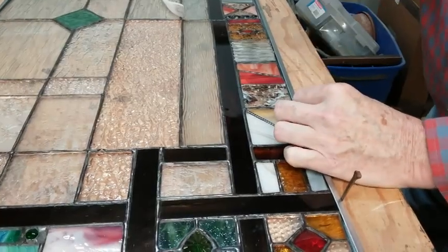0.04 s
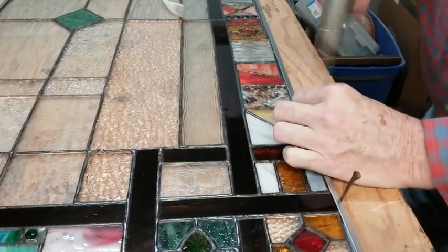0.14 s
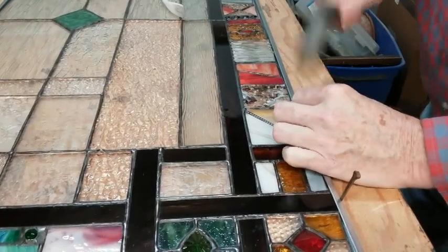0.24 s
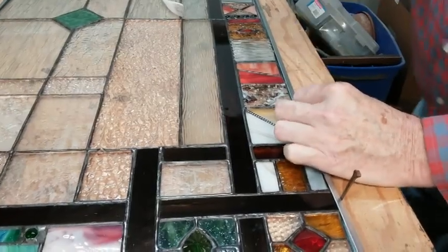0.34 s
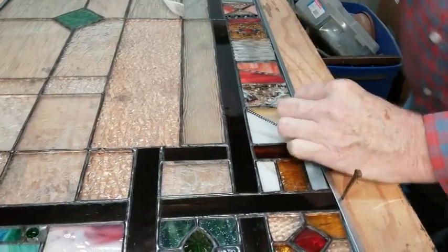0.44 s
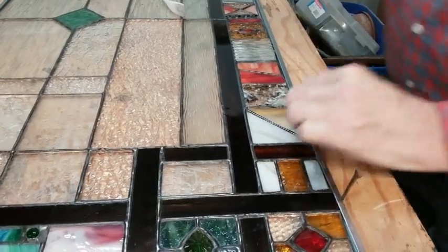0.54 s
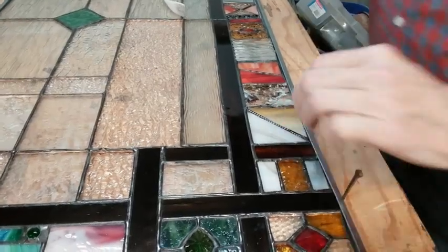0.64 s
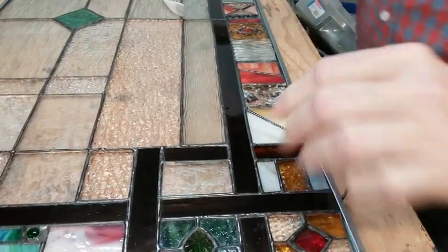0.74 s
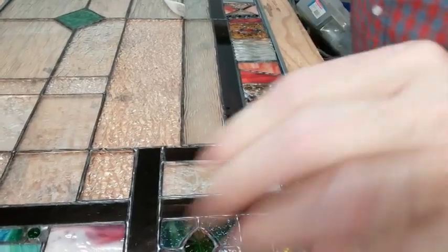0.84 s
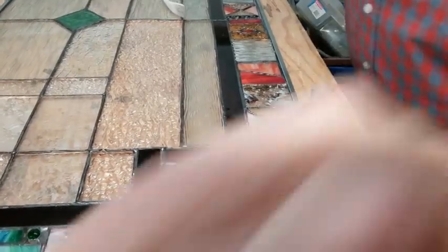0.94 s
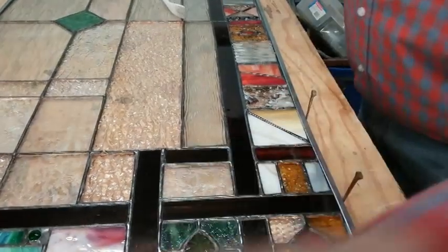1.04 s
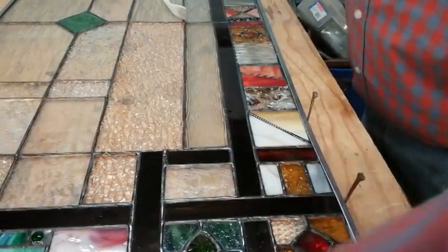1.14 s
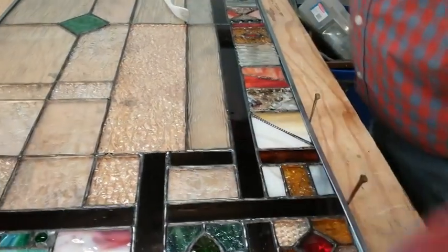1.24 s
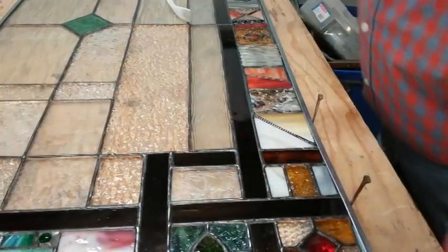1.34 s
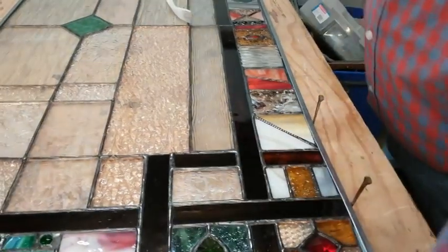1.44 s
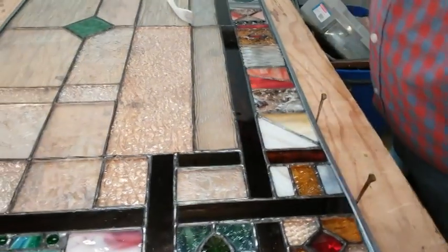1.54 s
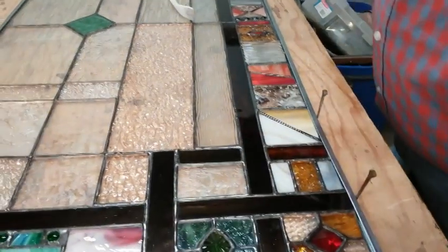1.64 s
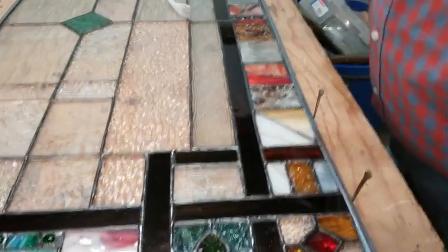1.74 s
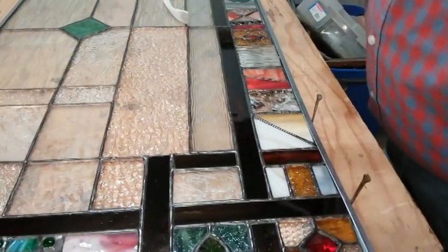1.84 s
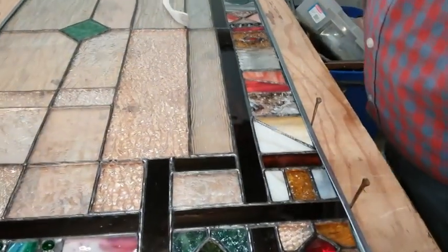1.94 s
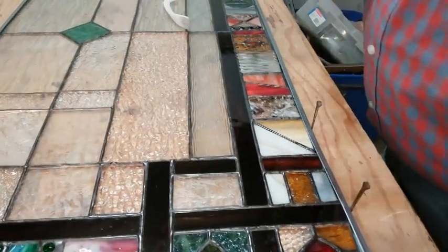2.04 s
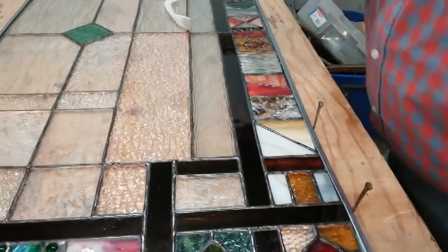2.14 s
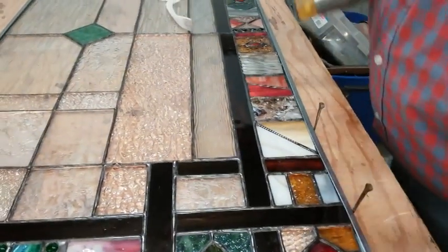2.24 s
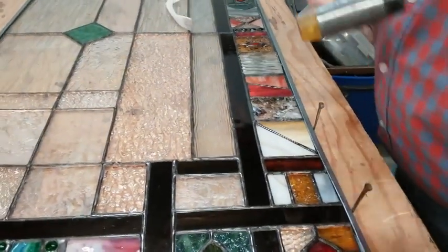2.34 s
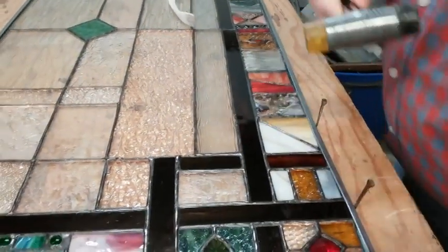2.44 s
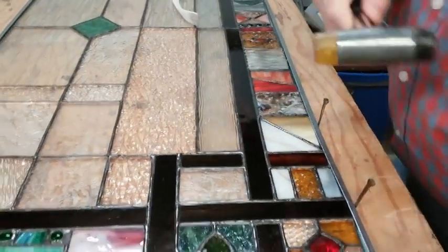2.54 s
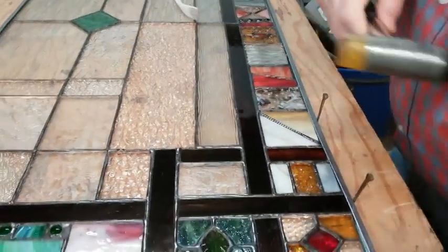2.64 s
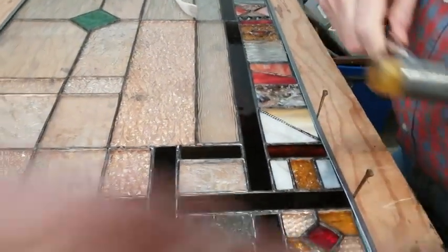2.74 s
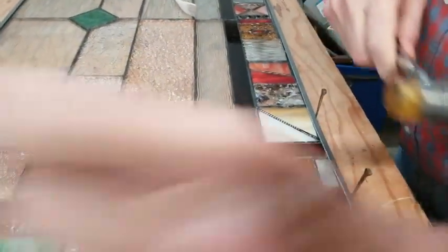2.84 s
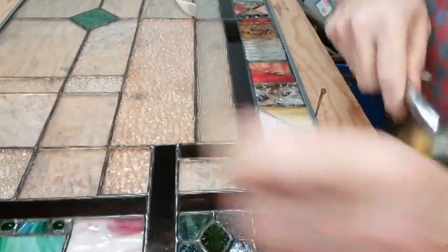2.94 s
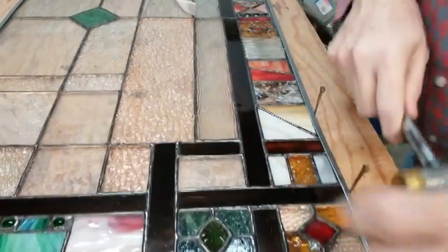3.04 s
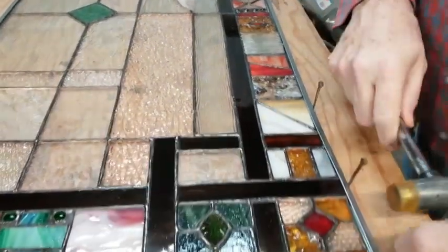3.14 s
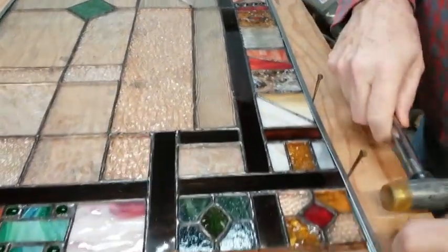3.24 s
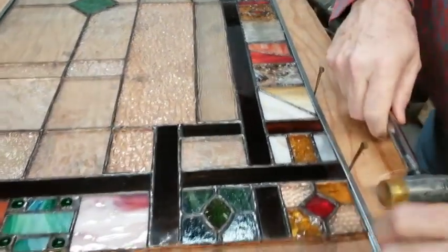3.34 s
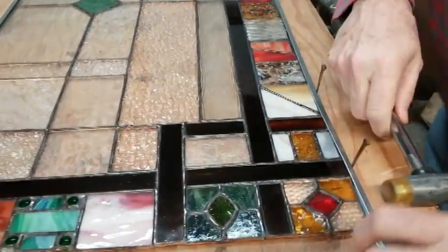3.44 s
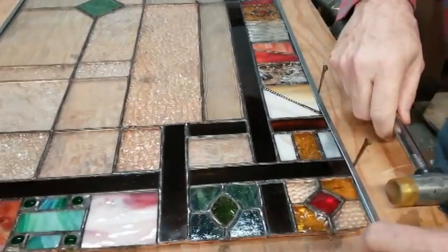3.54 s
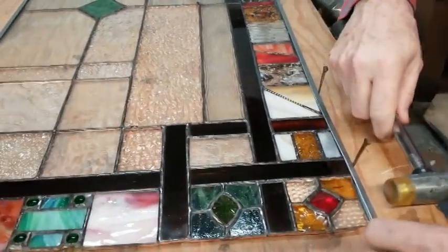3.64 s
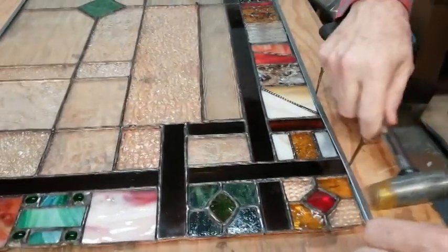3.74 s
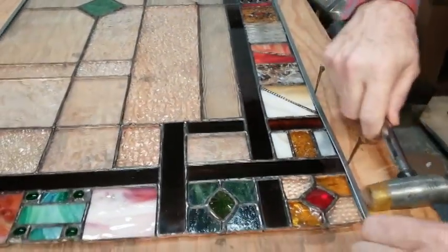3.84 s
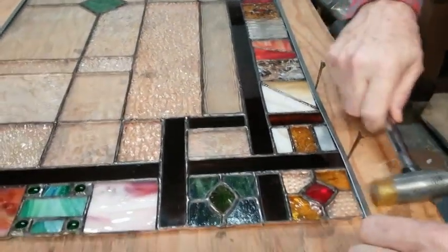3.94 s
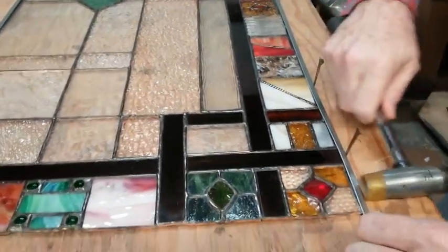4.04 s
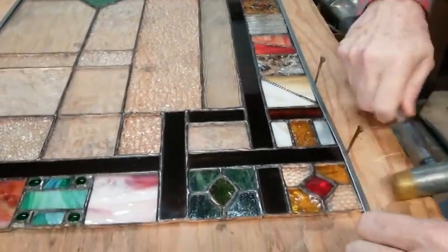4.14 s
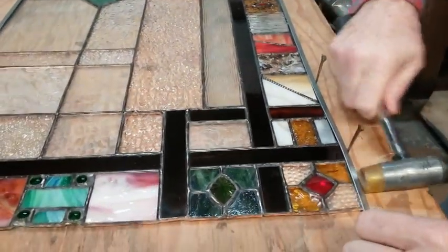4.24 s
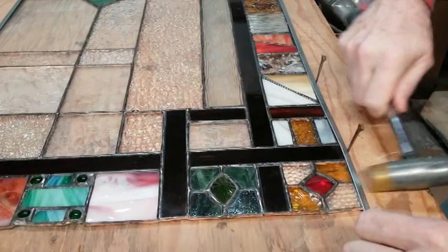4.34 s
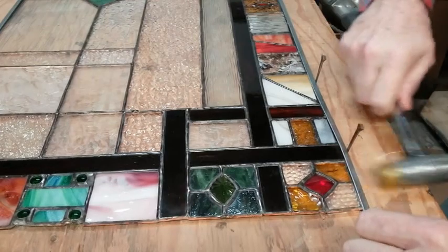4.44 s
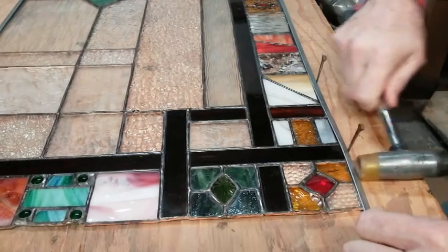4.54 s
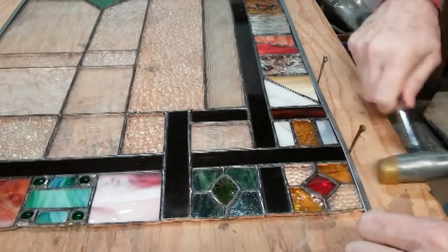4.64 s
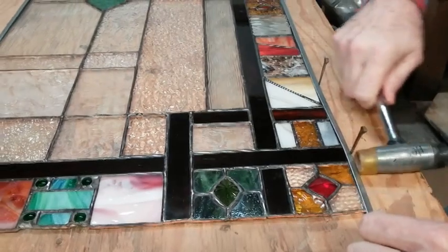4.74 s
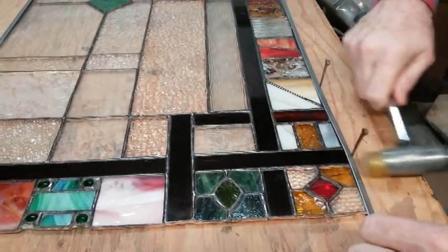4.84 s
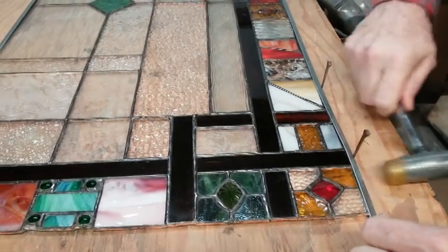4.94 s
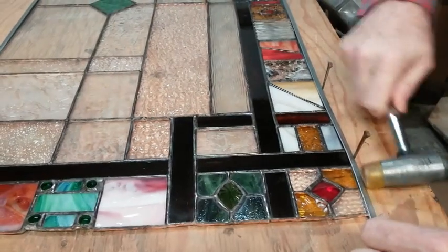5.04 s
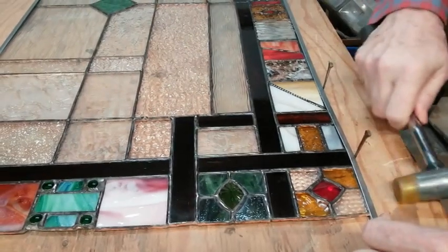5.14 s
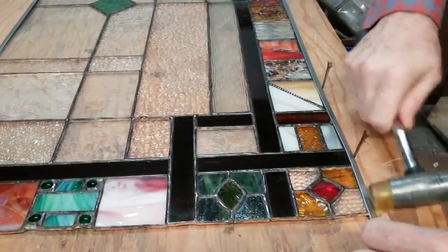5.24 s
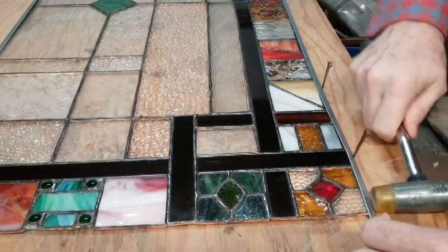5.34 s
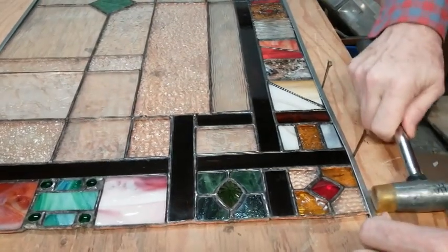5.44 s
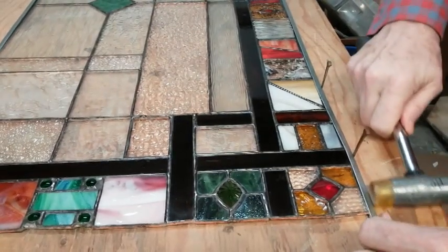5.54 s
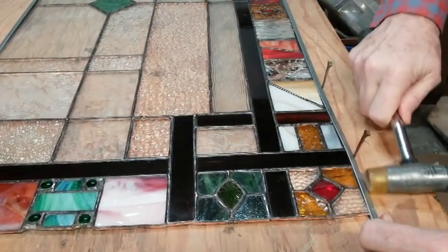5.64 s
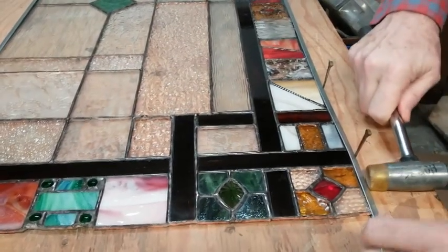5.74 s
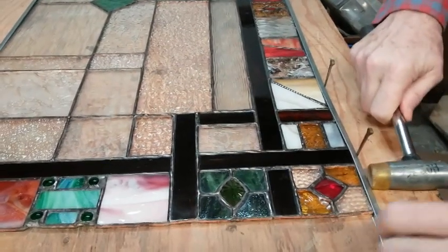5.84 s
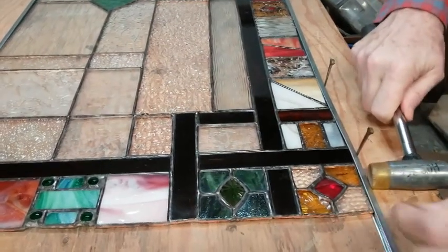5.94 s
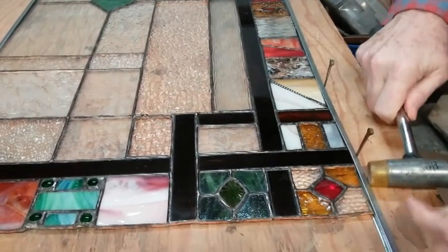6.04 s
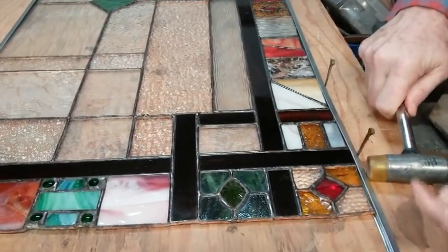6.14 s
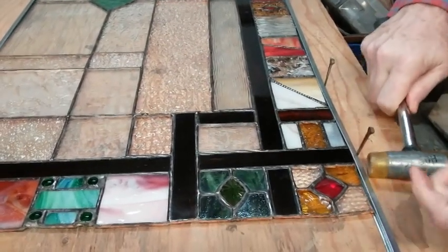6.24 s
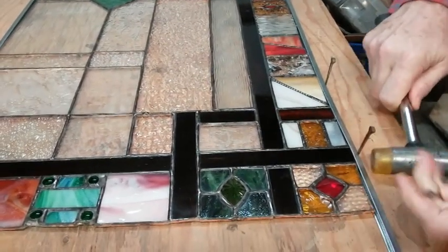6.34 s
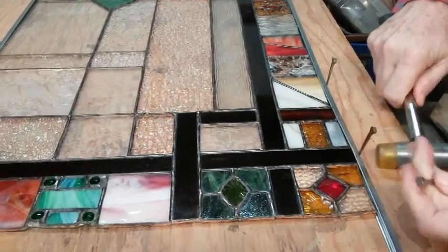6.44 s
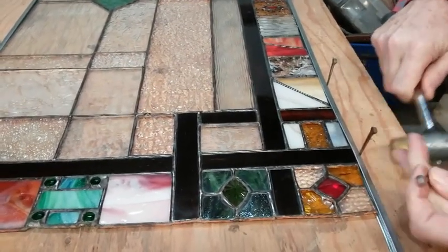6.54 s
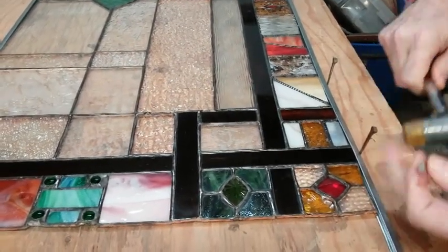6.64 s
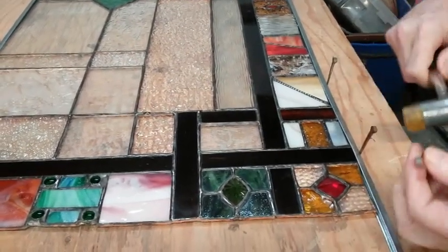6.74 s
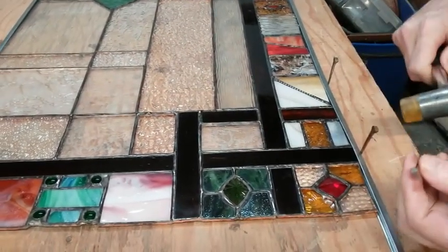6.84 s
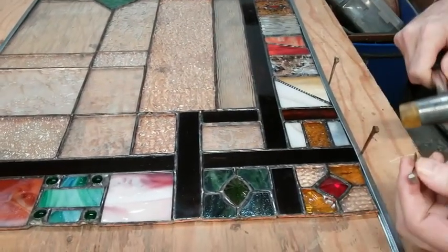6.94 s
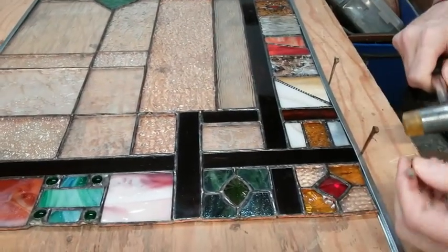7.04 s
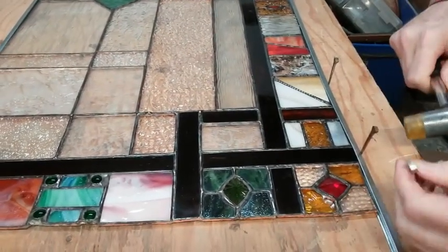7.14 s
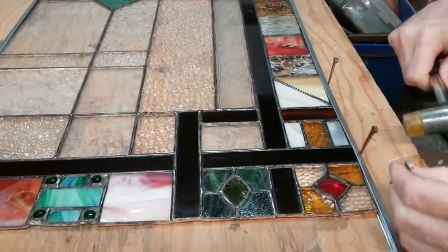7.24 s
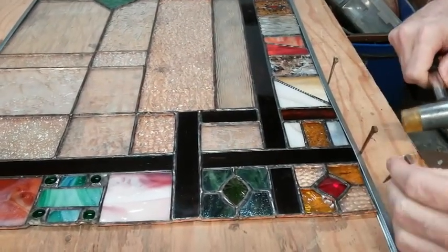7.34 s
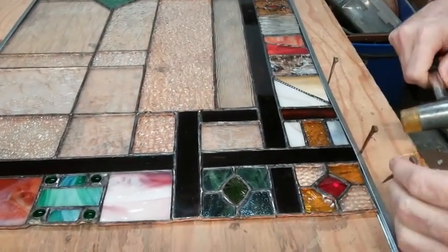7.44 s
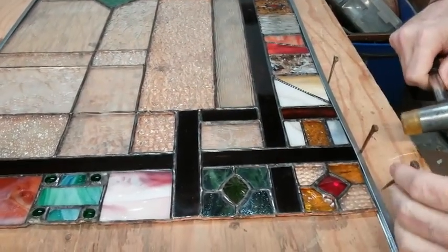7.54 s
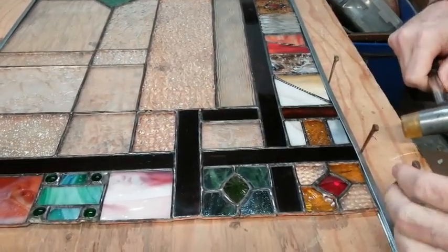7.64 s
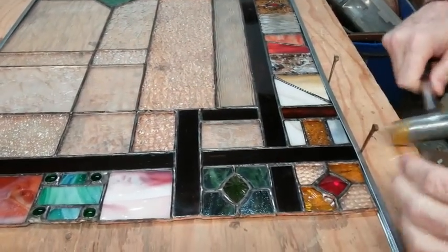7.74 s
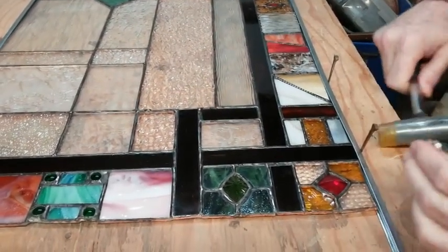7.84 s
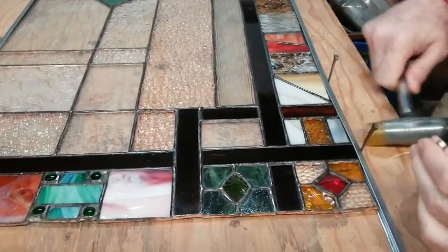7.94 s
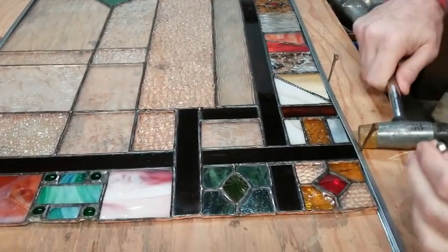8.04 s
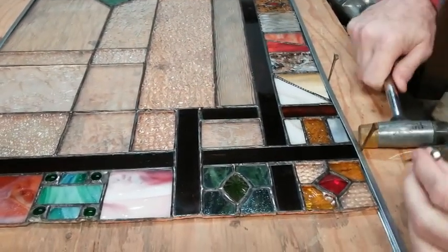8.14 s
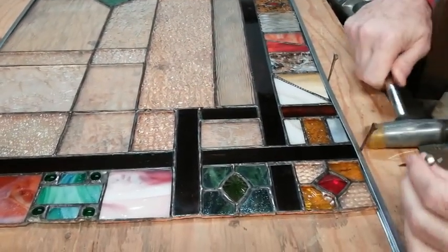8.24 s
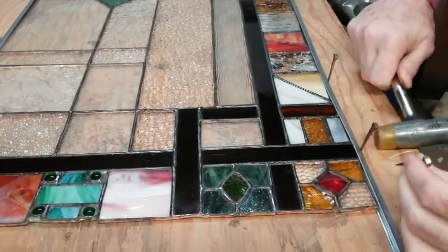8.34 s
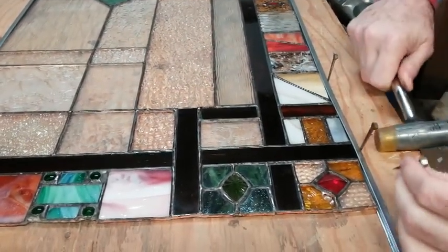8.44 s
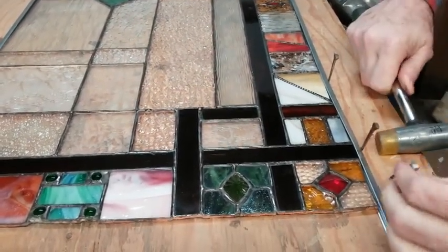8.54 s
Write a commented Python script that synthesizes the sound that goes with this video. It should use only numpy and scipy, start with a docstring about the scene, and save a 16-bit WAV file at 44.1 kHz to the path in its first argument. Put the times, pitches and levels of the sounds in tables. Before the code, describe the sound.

Close up in a small workshop, two hammer blows thud on a nail in a wooden board. Loose nails rattle and clink in a tub, then cloth brushes by. A run of light hammer taps follows, growing into sharper knocks with a short steel ring, the head sliding on the wood between them. Soft scraping and a few weak taps finish, over a low room rumble.

```python
"""A small hammer taps nails in on a wooden work board; each blow rings board, bench and workshop
as a thud, a knock, a nail ring and a steel crack. After the opening blows, fingers rummage in a tub
of clinking nails and a sleeve swishes past. Then the head is set down on its side and scrapes along
the wood, gliding up to the nail for each new tap. A low, steady room noise lies underneath."""
import sys
import numpy as np
from scipy import signal
from scipy.io import wavfile

SR = 44100
rng = np.random.default_rng(int(sys.argv[2]) if len(sys.argv) > 2 else 0)


def file_out(sig):
    """Save sig as 16-bit WAV at sys.argv[1]."""
    # one column per channel
    cols = np.atleast_2d(sig).T
    # limit, then scale
    lim = np.clip(cols, -1, 1)
    pcm = np.round(lim * 32767).astype(np.int16)
    wavfile.write(sys.argv[1], SR, pcm)


N = 379701

# room tone EQ: (frequency [Hz], gain [dB])
ROOM_TONE_EQ = [(15, -80.5), (25, -63.5), (58, 3.5), (123, -0.5), (175, -0.5), (195, -9.5), (249, -5),
                (384, -18.5), (476, -14.5), (796, -15), (1700, -21.5), (2000, -24.5), (5140, -44.5),
                (13200, -37.5), (16000, -37.5)]
# slow fader ride on the room tone: (time [s], gain [dB])
ROOM_TONE_RIDE = [(0, -6), (.7, -13.5), (1.35, -9), (3, 1.5), (5.7, -1), (8.6, -1)]
# workshop reverb decay: (frequency [Hz], t60 [s])
REVERB_DECAY = [(100, .5), (300, 0.4425), (1000, 0.3258), (4500, 0.47), (9000, 0.35), (15000, 0.57)]
# workshop reverb EQ: (frequency [Hz], gain [dB])
REVERB_EQ = [(80, -2.5), (200, 3), (500, 4.5), (1000, 1.5), (2200, 0.5), (4500, 0), (9000, -5.5),
             (15000, -10.5)]

# sleeve swishes: (peak time [s], rise [s], fall [s], level [dB])
SLEEVE_SWISHES = [(2.68, 0.074, 0.15, -33.5), (2.76, 0.042, 0.14, -33.5), (2.83, 0.16, .1, -37),
                  (2.96, 0.049, .15, -52)]
# tone of rubbing cloth: (frequency [Hz], gain [dB])
CLOTH_EQ = [(88, -23), (150, -19.5), (280, -11), (315, -27), (555, -17.5), (790, -17), (1340, -14),
            (1480, -14), (1870, -3.5), (3290, -16.5), (4670, -13), (8730, -22), (16000, -40)]

# fingers digging through the nails: (peak time [s], rise [s], fall [s], level [dB])
FINGER_STIRS = [(1.48, .035, 0.074, -32), (1.575, 0.051, 0.11, -23.5), (1.69, 0.03, 0.1, -29),
                (1.825, 0.027, .08, -35), (1.91, 0.082, 0.12, -24.5), (2.085, 0.068, 0.15, -35),
                (2.18, 0.041, 0.13, -37.5), (2.3, 0.067, 0.6, -53.5), (2.42, 0.025, 0.035, -34),
                (2.49, .05, 0.59, -39)]
# the loudest clinks, levels at the attack: (time [s], knock on the tub [dB], steel on steel [dB])
NAIL_CLINKS = [(1.48, -21.5, -47.5), (1.515, -26, -38), (1.5268, -11.5, -24), (1.5614, -21.5, -23.5),
               (1.574, -21, -32), (1.602, -18.5, -36.5), (1.672, -20.5, -26.5), (1.677, -17, -28.5),
               (1.811, -22.5, -35), (1.839, -24.5, -37), (1.8736, -23, -27), (1.881, -23, -16),
               (1.890, -17.5, -27), (1.898, -22, -22), (1.910, -16, -17), (1.918, -18, -14),
               (1.937, -17, -30), (2.08, -27, -28), (2.096, -27, -33), (2.160, -17, -22.5),
               (2.171, -22, -30.5), (2.200, -19, -40.5), (2.4197, -24, -44), (2.461, -20.5, -39.5),
               (2.484, -28, -44), (2.524, -23.5, -44)]
# body of the tub: (frequency [Hz], gain [dB])
TUB_EQ = [(60, -23.5), (100, 3.5), (160, 5), (300, -6), (440, 1), (700, -7), (1250, -0.5), (1700, -2.5),
          (2100, 5.5), (2650, 2.5), (3600, -23.5), (4900, -17), (6100, -36), (10200, -35.5), (12500, -54.5),
          (16000, -50)]
# resonances of the tub: (frequency [Hz], bandwidth [Hz], gain [dB])
TUB_RESONANCES = [(434, 40, -8), (1290, 110, 0), (2063, 1500, -8.5), (4555, 270, 8.5)]
# tone of nail against nail: (frequency [Hz], gain [dB])
STEEL_EQ = [(1500, -20), (3000, -6.5), (3900, -10), (4700, 8.5), (5400, -4.5), (6500, -14), (10500, -15.5),
            (16000, -30)]
# a nail lifted clear pings: (time [s], gain [dB])
NAIL_PINGS = [(2.171, -50), (2.462, -47)]
# modes of that free nail: (frequency [Hz], relative level [dB], t60 [s])
FREE_NAIL_MODES = [(7550, -4, .2), (9950, -2, .12), (10250, -5, .18)]

# head and fingers sliding: (peak time [s], rise [s], fall [s], scrape [dB], grazed nail singing [dB])
BOARD_SLIDES = [(0, .1, 0.28, -57, -84), (.75, 0.53, 0.44, -64.5, -90.5), (1.1, 0.011, 0.2, -55.5, -85),
                (3.14, .06, 0.11, -44.5, -79), (3.68, 0.084, .15, -44.5, -79),
                (3.78, 0.04, 0.033, -28.5, -48), (3.86, 0.15, 0.12, -41, -81),
                (4.08, 0.096, 0.18, -45.5, -77), (5.22, .1, 0.15, -42.5, -66),
                (5.7, 0.26, 0.43, -52.5, -81.5), (6.09, 0.15, 0.15, -53.5, -82),
                (6.21, 0.11, 0.32, -51.5, -73), (6.45, .04, 0.18, -47.5, -64),
                (6.56, 0.077, 0.12, -57, -69), (8.11, 0.094, 0.081, -47, -60.5),
                (8.35, 0.13, 0.31, -53, -72)]
# light touches of fingers and nails on the board: (time [s], attack level [dB])
BOARD_TOUCHES = [(0.8505, -52), (0.8671, -47.5), (1.089, -47.5), (3.7282, -30), (3.7804, -26.5),
                 (6.0064, -46), (6.0794, -43), (6.1999, -40.5)]
# tone of scraped wood grain: (frequency [Hz], gain [dB])
SCRAPE_EQ = [(150, 1.5), (400, 6.5), (900, 2), (1600, 4.5), (2400, -0.5), (3500, -15.5), (4250, -14),
             (4650, -10), (5150, -15.5), (5800, -20.5), (8300, -20.5), (11000, -34.5), (16000, -44)]
# the head skids as it is set down: (peak time [s], rise [s], fall [s], level [dB])
HEAD_SKID = [(3.467, 0.025, 0.082, -35)]
# tone of that skid: (frequency [Hz], gain [dB])
SKID_EQ = [(1200, -11), (2500, -2), (4800, -17), (9000, -33), (16000, -55)]

# blows and rebounds:
# (time [s], bench thud [dB], board knock [dB], nail ring [dB], steel crack [dB], reverb send [dB])
HAMMER_HITS = [(-0.035, -16.5, -23, -48.5, -55, -2), (0.2827, -13.5, -12, -29.5, -41.5, 4.5),
               (3.427, -27.5, -42.5, -64, -58, -2.5), (3.614, -22.5, -25, -47, -47.5, -6),
               (3.874, -23.5, -29.5, -50, -53.5, -5.5), (4.087, -20.5, -20.5, -44, -48, -7),
               (4.305, -10.5, -11, -73, -59, -12.5), (4.341, -14.5, -12.5, -22.5, -33, -4),
               (4.549, -20.5, -28.5, -79, -69, -8), (4.582, -11.5, -13.5, -22, -30.5, -5),
               (4.6276, -18, -18, -43.5, -66, -3), (4.8226, -10, -13, -25.5, -36, -5.5),
               (4.865, -20, -20.5, -62, -63, -4.5), (5.005, -26, -36.5, -78, -68, 1.5),
               (5.089, -9.5, -14.5, -24, -34, -3.5), (5.343, -9.5, -16.5, -24, -36.5, -5),
               (7.904, -20.5, -42.5, -73, -69.5, -2), (8.122, -28, -42, -71, -74, -2),
               (8.149, -27.5, -33.5, -60, -67, -3.5), (8.305, -34, -58, -70, -76, -1.5)]
# clear modes of board, bench and nail: (frequency [Hz], relative level [dB], t60 [s])
BOARD_MODES = [(97, -9, 0.4), (117.8, -16, 0.5), (144.9, -7.5, 0.46), (167.7, 0.5, 0.1), (299, -6, 0.19),
               (320, -2.5, 0.21), (454, -20, 0.24), (570, -3, 0.096), (725.5, -0.5, 0.1), (735.4, 0.5, .09),
               (837, -1, 0.019), (1070, -22.5, 0.57), (1437, -5, 0.034), (1493, 4, 0.05),
               (1432, 0.5, 0.014), (1815, -5.5, 0.03), (1896, -4, .04), (2620, -27, 0.053),
               (4580, -12.5, 0.011), (4558, -4.5, 0.057), (4600, -23.5, 0.0083), (7740, -2.5, 0.0083),
               (8410, -4.5, 0.037)]
# the thud, knock, ring and crack layers, each with a wash of crowded weak modes:
# (low cut [Hz], high cut [Hz], wash t60 [s], wash against clear modes [dB], reverb send trim [dB])
HIT_LAYERS = [(68, 562, 0.052, 1, -3.5), (484, 1980, 0.049, -1.5, 0), (2750, 6000, 0.033, 6, 0),
              (5470, 13000, 0.014, 7.5, 8)]
# tone of the contact click and the wash: (frequency [Hz], gain [dB])
WOOD_EQ = [(50, -9.5), (100, 1), (160, 5), (320, 1), (600, -3), (1100, -2), (1550, -3), (2500, -7),
           (3400, -18.5), (4000, -14), (4600, -12), (5700, -32), (8200, -33.5), (16000, -52)]

HEAD_DOWN_S = 3.4  # from here on the head lies on the board
# the opening blows hit a nail that is almost home: the wood's grip shortens its modes
GRIP_T60_RATIO, NAIL_FROM_HZ = .15, 3000


def amp(db):
    """Decibels to gain."""
    return 10 ** (np.asarray(db) / 20)


def unit(x):
    """Scales to rms 1."""
    return x / np.sqrt(np.mean(x ** 2) + 1e-20)


def decay(t, t60):
    """Envelope that falls 60 dB in t60 seconds."""
    return amp(-60 * t / t60)


def curve_at(points, hz):
    """Reads a curve on a log-frequency axis."""
    point_hz, values = np.transpose(points)
    return np.interp(np.log(hz + 1), np.log(point_hz + 1), values)


def add(mix, s, sound):
    """Drops a sound into the mix at time s."""
    start = round(s * SR)
    sound = sound[max(-start, 0):]
    part = mix[max(start, 0):][:len(sound)]
    part += sound[:len(part)]


def eq(x, curve):
    """Minimum-phase EQ, so attacks stay sharp."""
    hz = abs(np.fft.fftfreq(4096, 1 / SR))
    log_gain = np.log(amp(curve_at(curve, hz)))
    response = np.exp(np.conj(signal.hilbert(log_gain)))
    taps = np.fft.ifft(response).real[:2048]
    return signal.oaconvolve(x, taps)[:len(x)]


def level_eq(x, curve):
    """EQ with make-up gain: the power stays the same."""
    return unit(eq(x, curve)) * x.std()


def band(x, low_hz, high_hz):
    """Causal band-pass."""
    return signal.sosfilt(signal.butter(3, [low_hz, high_hz], "band", fs=SR, output="sos"), x)


def strokes(rows, span_db=20):
    """Envelope of hand moves: a rounded swell, then an even fade, each covering span_db in its time."""
    t, power = np.arange(0, N, 32) / SR, 0
    for s, rise_s, fall_s, db in rows:
        from_peak = np.where(t < s, ((s - t) / rise_s) ** 2, (t - s) / fall_s)
        power = power + amp(db - span_db * np.minimum(from_peak, 10)) ** 2
    return np.interp(np.arange(N) / SR, t, np.sqrt(power))


def friction(slips_per_s, spread_db, hiss):
    """Rubbing texture: tiny slips of uneven size over a smooth hiss."""
    sizes = amp(spread_db * np.minimum(rng.exponential(1, N), 4))
    slips = (rng.random(N) < slips_per_s / SR) * rng.standard_normal(N) * sizes
    return unit(unit(slips) + hiss * rng.standard_normal(N))


def snaps(rows, t60):
    """Small contacts: a sharp tick and brief chatter, with the level set over the first 2 ms."""
    out, t = np.zeros(N), np.arange(2048) / SR
    for s, db in rows:
        chatter = unit(rng.standard_normal(len(t)) * decay(t, t60))
        burst = chatter + .5 * unit(t == 0)
        add(out, s, amp(db) * burst / burst[t < .002].std())
    return out


def room_tone(base_db=-47.5):
    """The bed: low rumble with a faint hiss, swelling slowly."""
    ride_db = np.interp(np.arange(N) / SR, *np.transpose(ROOM_TONE_RIDE))
    rumble = eq(rng.standard_normal(N + SR), ROOM_TONE_EQ)[SR:]
    return amp(base_db + ride_db) * unit(rumble)


def workshop_reverb(x, bass_build_s=.013, treble_build_s=.0087):
    """Dense reflections of a small room; the bass builds up later than the treble."""
    hz, t, spectrum = signal.stft(rng.standard_normal(SR * 3 // 4), SR, nperseg=256)
    build_s = curve_at([(150, bass_build_s), (1500, treble_build_s)], hz)[:, None]
    fade_in = np.clip(t / build_s - .5, 0, 1)
    fade_out = decay(t, curve_at(REVERB_DECAY, hz)[:, None])
    tail = signal.istft(spectrum * fade_in * fade_out, SR, nperseg=256)[1]
    response = eq(tail / np.linalg.norm(tail), REVERB_EQ)
    return signal.fftconvolve(x, response)[:len(x)]


def sleeve():
    """Cloth rubs and swishes past as the arm comes back."""
    rubbing = friction(slips_per_s=3000, spread_db=1.5, hiss=1)
    return strokes(SLEEVE_SWISHES) * level_eq(rubbing, CLOTH_EQ)


def loose_nails(drive, count=36, low_hz=2900, high_hz=11500, t60=.014, tilt_db_per_octave=-7):
    """Nails of different lengths; each rings thinly when it happens to be struck."""
    t, out = np.arange(SR // 16) / SR, np.zeros(N)
    struck_nail = rng.integers(0, count, N // 32 + 1).repeat(32)[:N]
    pitches = np.geomspace(low_hz, high_hz, count) * rng.uniform(.98, 1.02, count)
    for k, hz in enumerate(pitches):
        gain = amp(tilt_db_per_octave * np.log2(hz / low_hz))
        ring = gain * np.sin(2 * np.pi * hz * t) * decay(t, t60)
        out += signal.oaconvolve(drive * (struck_nail == k), ring)[:N]
    return unit(out) * drive.std()


def picked_nail():
    """A nail lifted clear of the others rings freely for a moment."""
    t, out = np.arange(SR // 4) / SR, np.zeros(N)
    ring = sum(amp(db) * decay(t, t60) * np.sin(2 * np.pi * hz * t) for hz, db, t60 in FREE_NAIL_MODES)
    for s, db in NAIL_PINGS:
        add(out, s, amp(db) * ring)
    return out


def nail_tub():
    """Fingers stir small nails, which knock against their tub and clink on each other."""
    stirring = strokes(FINGER_STIRS) * friction(slips_per_s=1800, spread_db=2.5, hiss=.75)
    knocks = snaps([(s, db) for s, db, _ in NAIL_CLINKS], t60=.028)
    clinks = snaps([(s, db) for s, _, db in NAIL_CLINKS], t60=.027)
    drive = knocks + stirring
    resonance = sum(amp(db) * signal.lfilter(*signal.iirpeak(hz, hz / width, SR), drive)
                    for hz, width, db in TUB_RESONANCES)
    tub = unit(eq(drive + resonance, TUB_EQ)) * drive.std()
    steel = level_eq(clinks + amp(-9.5) * stirring, STEEL_EQ)
    sound = tub + steel + amp(-15.5) * loose_nails(drive) + picked_nail()
    return sound + amp(-12) * workshop_reverb(sound)


def board_slides(glide_rise_s=.045, glide_fall_s=.09, scrape_trim_db=-13.5, sing_trim_db=-31.5):
    """The hammer head and fingers scrape over the wood grain, and grazed nails sing."""
    # once the head is down, a glide leads into each blow and follows the level of its nail ring
    glides = [(s, glide_rise_s, glide_fall_s, nail_db + scrape_trim_db, nail_db + sing_trim_db)
              for s, _, _, nail_db, _, _ in HAMMER_HITS if s > HEAD_DOWN_S]
    moves = list(BOARD_SLIDES) + glides
    scrape_envelope = strokes([(*timing, db) for *timing, db, _ in moves])
    sing_envelope = strokes([(*timing, db) for *timing, _, db in moves])
    grain = friction(slips_per_s=1400, spread_db=5, hiss=.95)
    touches = snaps(BOARD_TOUCHES, t60=.036)
    scrape = level_eq(scrape_envelope * grain + touches, SCRAPE_EQ)
    singing = band(friction(slips_per_s=920, spread_db=2.5, hiss=.51), low_hz=4400, high_hz=4850)
    skid = eq(friction(slips_per_s=1800, spread_db=2.5, hiss=1), SKID_EQ)
    sound = scrape + sing_envelope * unit(singing) + strokes(HEAD_SKID) * unit(skid)
    return sound + amp(-8.5) * workshop_reverb(sound)


def board_ring(t, nail_t60_ratio, vary_db=1.5, detune=.008):
    """Board, bench and nail ring in clear modes; level and pitch vary a little with each blow."""
    modes = np.zeros(len(t))
    for k, (hz, db, t60) in enumerate(BOARD_MODES):
        size, shift = rng.standard_normal(2)
        if hz > NAIL_FROM_HZ:
            t60 *= nail_t60_ratio
        envelope = amp(db + vary_db * size) * decay(t, t60)
        modes += (-1) ** k * envelope * np.sin(2 * np.pi * hz * (1 + detune * shift) * t)
    return modes


def hammer_blow(layers_db, send_db, nail_t60_ratio):
    """One impact in four bands, each a blend of contact click, clear modes and a wash of weak ones."""
    t = np.arange(SR // 3) / SR
    attack = t < .01  # layers are balanced on their first 10 ms
    modes = board_ring(t, nail_t60_ratio)
    contact = eq(signal.unit_impulse(len(t)), WOOD_EQ)
    direct, send = np.zeros((2, len(t)))
    for db, (low_hz, high_hz, t60, wash_db, trim_db) in zip(layers_db, HIT_LAYERS):
        weak_modes = eq(rng.standard_normal(len(t)) * decay(t, t60), WOOD_EQ)
        click, ring, wash = band(np.array([contact, modes, weak_modes]), low_hz, high_hz)
        layer = click / click[attack].std() + ring / ring[attack].std()
        layer += amp(wash_db) * wash / wash[attack].std()
        layer *= amp(db) / layer[attack].std()
        direct += layer
        # the room gathers sound from every side of the board, which evens out its peaks
        evened = amp(-3.5) * unit(click) * layer.std() + amp(-8) * layer
        send += amp(trim_db) * evened
    tail_space = (0, SR // 2)
    return np.pad(direct, tail_space) + amp(send_db) * workshop_reverb(np.pad(send, tail_space))


def hammer():
    """Steel strikes the nails: choked on the opening blows, ringing on the later taps and rebounds."""
    out = np.zeros(N)
    for s, *layers_db, send_db in HAMMER_HITS:
        nail_t60_ratio = GRIP_T60_RATIO if s < HEAD_DOWN_S else 1
        add(out, s, hammer_blow(layers_db, send_db, nail_t60_ratio))
    return out


def scene():
    """The mono mix: hammer up front, handling sounds around it, room tone underneath."""
    return (hammer() + nail_tub() + sleeve() + board_slides() + room_tone())[None]


def record(dry, ceiling=.98, high_cut_hz=15950):
    """A soft clipper rounds off the hardest peaks, then a steep high cut trims the top."""
    rounded = dry / (1 + (dry / ceiling) ** 6) ** (1 / 6)
    high_cut = signal.firwin(511, high_cut_hz, window=("kaiser", 9), fs=SR)
    return signal.oaconvolve(rounded, high_cut[None], "same")


dry = scene()
out = record(dry)
file_out(out)
```